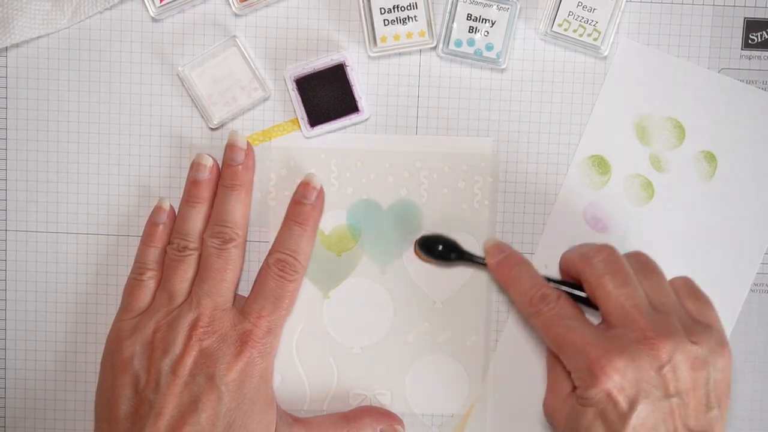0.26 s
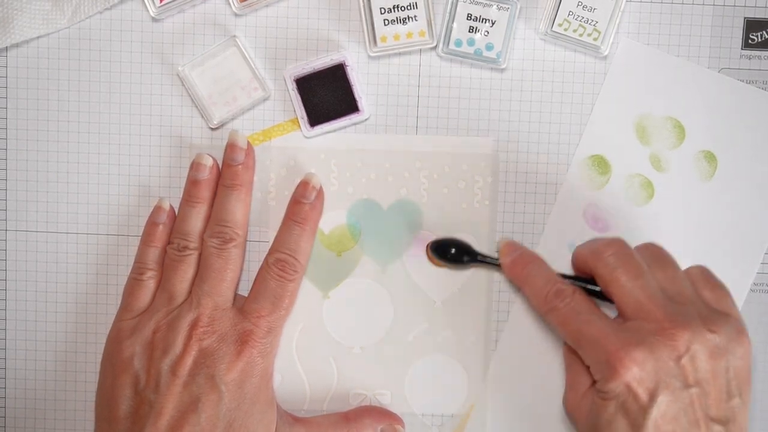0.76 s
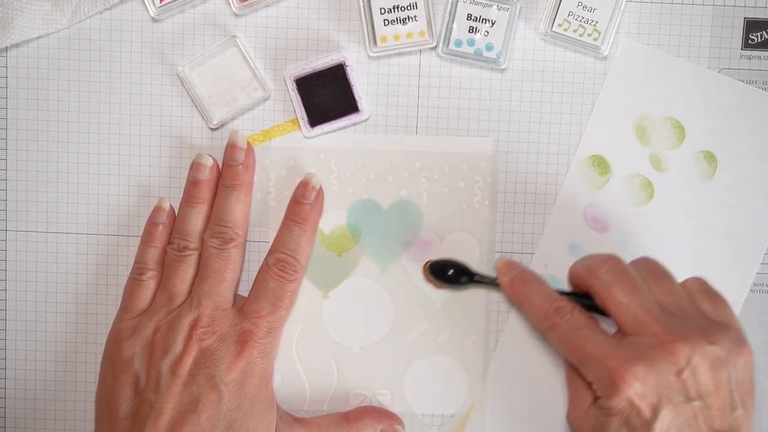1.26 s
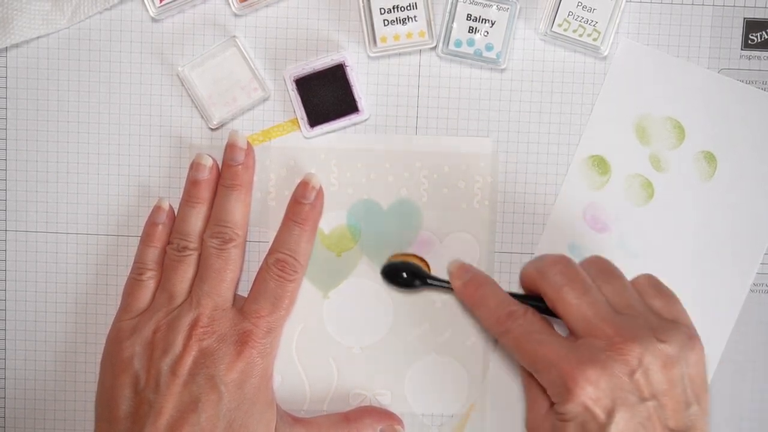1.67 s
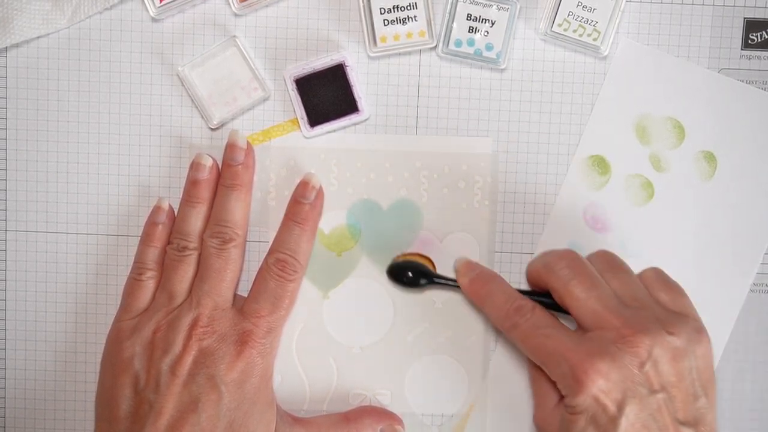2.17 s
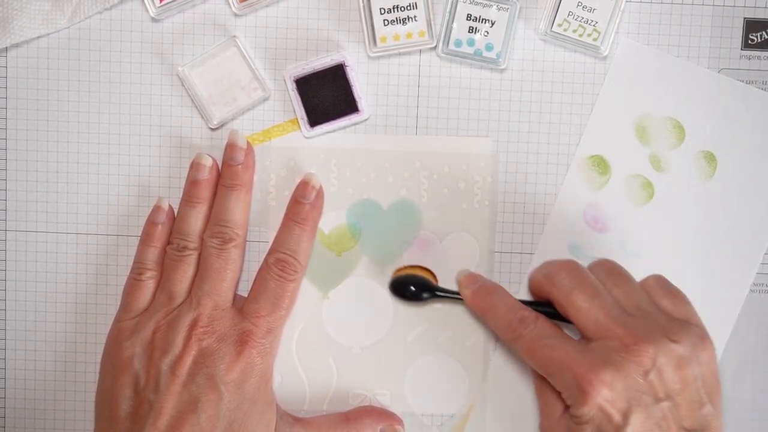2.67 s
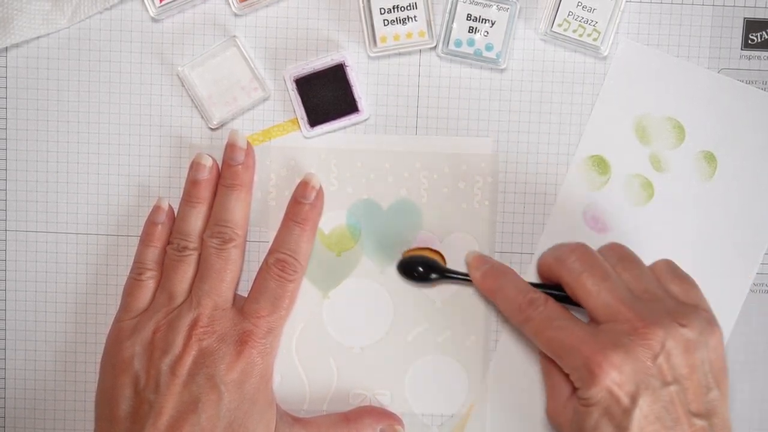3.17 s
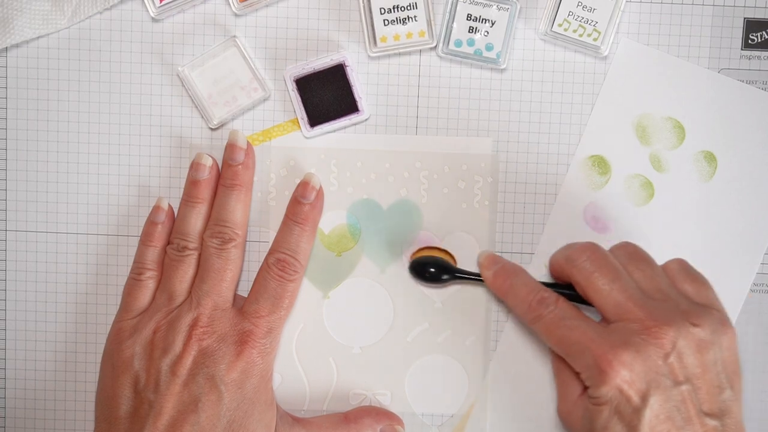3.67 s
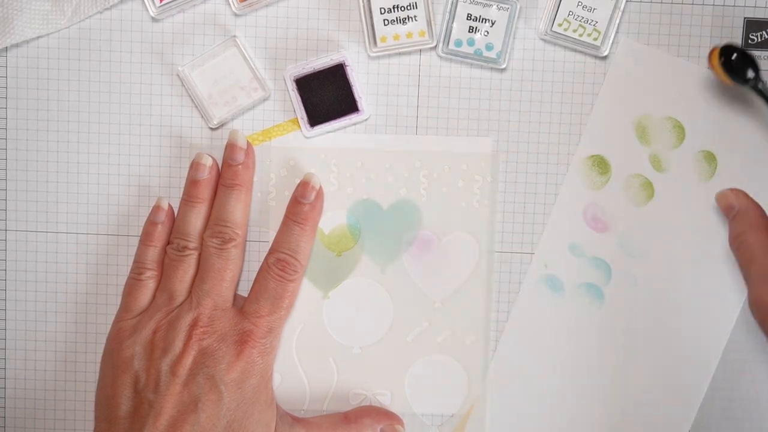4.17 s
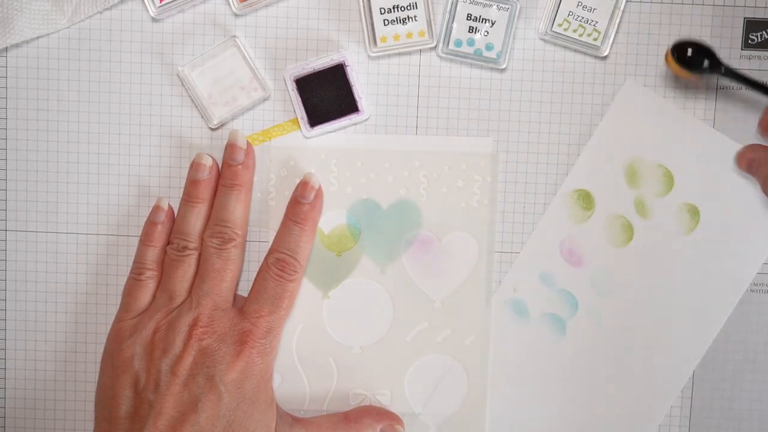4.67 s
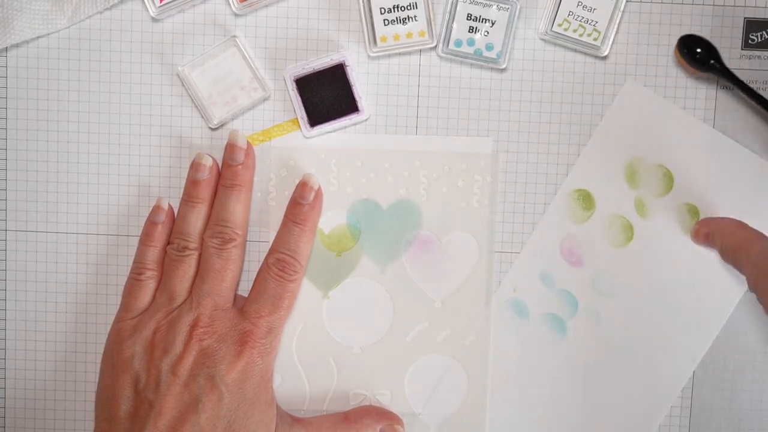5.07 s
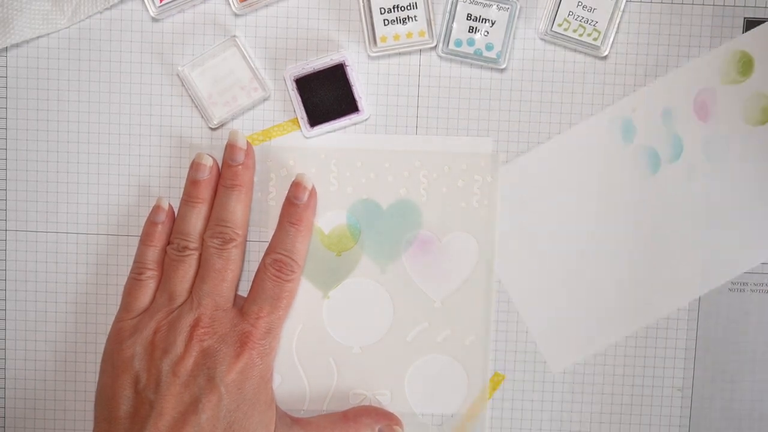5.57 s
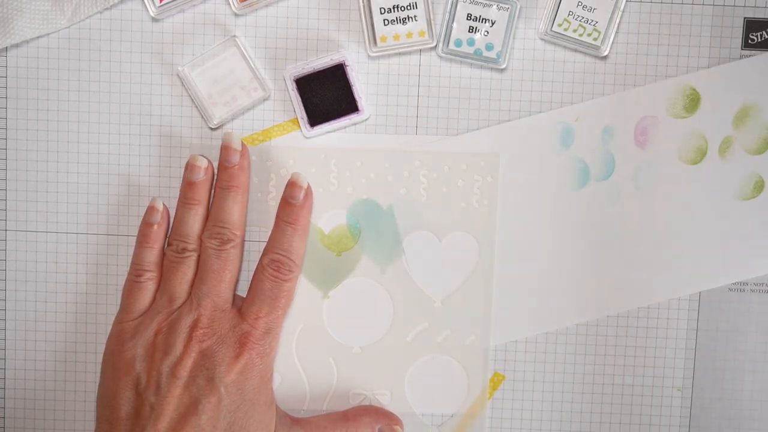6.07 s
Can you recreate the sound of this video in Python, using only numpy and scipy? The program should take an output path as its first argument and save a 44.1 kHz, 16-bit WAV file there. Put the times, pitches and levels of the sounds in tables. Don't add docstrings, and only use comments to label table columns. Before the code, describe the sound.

Close stereo pickup of a craft table: very quiet bristle swishes grow slightly firmer, with tiny clicks on cut edges and soft table creaks. After a brief lull, paper snaps sharply once, pauses, snaps again even louder, then scrapes across the mat in uneven strokes and fades, leaving the low hum and faint air noise of an appliance.

```python
import sys
import numpy as np
from scipy import signal
from scipy.fft import rfft, irfft, next_fast_len
from scipy.io import wavfile
from scipy.ndimage import uniform_filter1d, map_coordinates

SR = 44100
rng = np.random.default_rng(int(sys.argv[2]) if len(sys.argv) > 2 else 0)


def wav_record(signal):
    frames = np.transpose(np.atleast_2d(signal))
    bounded = np.clip(frames, -1, 1)
    quanta = np.round(bounded * 32767).astype(np.int16)
    wavfile.write(sys.argv[1], SR, quanta)


def field_ratio(decibels):
    return 10 ** (np.asarray(decibels, dtype=float) / 20)


N = 278271

# [f/Hz, level/dB rms]
HUM_TONES = [(59.2, -101), (360.7, -71.5), (480.3, -77.5)]
# [f/Hz, density/dB per Hz]
AIR_SPECTRUM = [(20, -47), (90, -41.5), (125, -34), (200, -26), (250, -29), (300, -23), (390, -14.5),
                (440, -21), (520, -22.5), (750, -28), (1000, -25.5), (2400, -26.5), (6000, -32.5),
                (11000, -35), (15700, -37.5)]
# [f/Hz, left-right likeness/0..1]
AIR_ALIKE = [(30, .999), (150, 1), (550, 0.83), (1650, 0.36), (4970, .32), (15000, .13)]
AIR_LEVEL_DB = -70

# [middle t/s, bristle hiss level/dB, length/s]
STROKES = [(0.084, -71.1, 0.077), (0.185, -72.0, 0.07), (0.382, -69.2, 0.195), (0.61, -69.7, 0.261),
           (0.754, -69.8, 0.055), (0.829, -66.3, 0.096), (0.952, -63.7, 0.127), (1.087, -65.0, 0.086),
           (1.209, -63.3, 0.169), (1.351, -65.2, 0.084), (1.438, -61.9, 0.08), (1.539, -63.0, 0.3),
           (1.672, -59.3, 0.106), (1.782, -60.7, 0.08), (1.93, -61.6, 0.175), (2.172, -61.6, 0.211),
           (2.31, -68.0, 0.29), (2.433, -65.8, 0.048), (2.505, -65.1, 0.3), (2.666, -57.8, 0.077),
           (2.776, -61.1, 0.145), (2.91, -59.6, 0.105), (3.011, -62.2, 0.056), (3.164, -59.8, 0.177),
           (3.289, -58.8, 0.135), (3.377, -58.1, 0.061), (3.497, -61.1, 0.153), (3.667, -64.3, 0.083),
           (3.837, -59.7, 0.269), (3.987, -57.6, 0.096)]
# [t/s, loss/dB]
HALTS = [
    (1.555, 6),
    (2.312, 3),
    (2.797, 9),
    (3.81, 4),
]
HALT_S = .012
# [t/s, fizz re hiss/dB, stencil body re hiss/dB]
BRUSH_LEANING = [(0.0, 5, -18), (0.3, 4, -18), (0.45, 0, -16), (0.9, -1, -18), (1.5, 2, -11),
                 (1.68, 1, -19), (1.79, 1, -10), (1.86, 1, -14), (2.3, 1.5, -12), (2.7, 0, -15),
                 (3.1, 1, -16), (3.3, 4, -8), (3.38, 1, -12), (3.52, 4.5, -7), (3.8, 3.5, -7),
                 (4.05, 2, -14)]
# [f/Hz, width/Hz, level/dB]
STENCIL_MODES = [(1810, 47, -4), (2853, 53, -2.5), (3840, 110, -3.5), (4404, 32, -2.5), (4880, 34, -3),
                 (5724, 270, 0), (6660, 230, 0.5), (7370, 52, -3), (7900, 120, -6), (8780, 130, 0.5),
                 (9400, 570, 0.5), (10260, 170, -6.5), (11400, 370, -15), (11700, 130, -0.5),
                 (12600, 120, -0.5), (15000, 170, -6)]
# [f/Hz, density/dB per Hz]
BRISTLE_SPECTRUM = [(350, -52), (600, -24.5), (1560, -21), (1860, -12), (3220, -13), (3850, -5),
                    (5190, -10.5), (5790, -4.5), (7310, -5.5), (12100, 0), (15700, -0.5)]
# [f/Hz, left-right likeness/0..1]
BRUSH_ALIKE = [(60, 1.0), (180, 0.86), (550, 0.82), (1650, 1), (4970, 0.8), (15000, 0.5)]
# [f/Hz, left minus right/dB]
BRUSH_BALANCE = [(60, 0.0), (180, 0.5), (550, 1.5), (1650, -1.5), (4970, -2.9), (15000, -0.5)]

# [full t/s, level/dB, rise/s per 20 dB, hold/s, fall/s per 20 dB]
CREAKS = [
    (.25, -74, .04, .04, .1),
    (1.9, -71, .05, .08, .1),
    (2.33, -75, .02, .02, .06),
    (2.81, -72, .005, .03, .1),
    (3.065, -69, .006, .06, .12),
    (3.9, -71, .02, .05, .1),
    (4.34, -71, .03, .05, .1),
    (4.5, -73, .02, .04, .1),
    (4.69, -74, .02, .03, .1),
    (5.15, -73, .02, .04, .1),
]
# [f/Hz, density/dB per Hz]
FRAME_SPECTRUM = [(150, -40), (250, -6), (300, 0), (480, 2), (560, 0), (700, -20), (1000, -50)]

# [t/s, peak/dB, centre f/Hz, t60/s]
TICKS = [(1.568, -40.5, 4360, 0.017), (1.8294, -51, 5700, 0.02), (3.3564, -38.5, 5700, 0.016),
         (3.8403, -33.5, 7200, 0.012), (3.849, -34, 7000, 0.01), (4.3186, -46, 9000, 0.011),
         (4.453, -50, 8000, .015), (4.9686, -52, 7100, 0.017), (5.0675, -39.5, 6780, 0.02),
         (5.1105, -37, 7800, 0.014), (1.6363, -46, 6000, .015), (2.1342, -48, 9500, .012),
         (2.645, -48, 5500, .012), (2.8072, -45, 5000, .016), (3.0601, -51, 3000, .016),
         (3.145, -46, 5500, .01), (2.517, -55, 1880, 0.03), (2.809, -48, 1880, 0.03),
         (3.061, -52, 1040, 0.037)]

# [full t/s, level/dB, rise/s per 20 dB, hold/s, fall/s per 20 dB]
SCUFFS = [(2.085, -61.5, .045, .05, .14), (2.2, -70, .03, .03, .15), (2.325, -68, .015, .01, .06),
          (2.522, -78, .02, .01, .06), (2.809, -64, .004, .004, .05), (3.064, -64, .01, .008, .06),
          (3.09, -70, .02, .04, .06), (3.872, -62.5, .015, .02, .1), (3.9, -60.5, .03, .04, .16),
          (4.47, -66, .004, .01, .1), (5.112, -67, .003, .005, .03), (5.137, -58, .004, .004, .02),
          (5.165, -64, .004, .04, .15), (5.255, -58, .005, .01, .17)]
# [f/Hz, width/Hz, level/dB]
TABLE_MODES = [(953, 110, -10), (1300, 100, 3.5), (1820, 85, 2)]
# [f/Hz, density/dB per Hz]
THUD_SPECTRUM = [(200, -28.5), (450, 3), (700, -3), (1300, -1.5), (2100, -2), (2700, -15.5), (5000, -40)]

# [full speed t/s, rasp level/dB, rise/s per 20 dB, hold/s, fall/s per 20 dB]
SLIDES = [(4.325, -89, .005, .065, .03), (4.425, -75, .045, .03, .025), (4.473, -60.5, .005, .033, .053),
          (4.557, -66, .021, .028, .013), (4.674, -37.5, .06, .037, .055), (4.765, -67, .061, 0, .28),
          (5.023, -75, .032, .063, .028), (5.128, -39, .009, .021, .04), (5.168, -44, .025, .023, .072),
          (5.231, -44, .02, .011, .02), (5.261, -30, .01, .016, .082), (5.321, -38.5, .016, .126, .066),
          (5.483, -35.5, .07, .038, .032), (5.537, -38.5, .105, .049, .026), (5.598, -44, .009, .043, .145),
          (5.677, -40.5, .04, .072, .093), (5.772, -41.5, .03, .045, .04), (5.859, -37.5, .036, .016, .04),
          (5.946, -42, .099, .014, .07), (5.988, -39.5, .021, .018, .015), (6.026, -67, .003, 0, .33),
          (6.176, -76, .01, .005, .01)]
# [from t/s, fingertip hiss re rasp/dB, sheet body re rasp/dB]
CONTACTS = [(4.2, 18.5, 0), (4.464, 1, 1), (4.54, 5, -9), (4.615, 5, -23), (4.67, 4, -15), (4.705, -6, -7),
            (4.995, 14, 2), (5.112, -3, -21), (5.165, 2.5, -9), (5.246, -7, -9), (5.315, 1, -11),
            (5.365, -5, -15), (5.41, -1.5, -17), (5.54, -3, -16), (5.655, -1, -8), (5.705, -1, -13),
            (5.76, 1, -9), (5.8, 0, -15), (5.845, -6, -9), (5.89, -1.5, -4), (5.975, -1, -9),
            (6.005, -2, -1), (6.03, -2, -6)]
CONTACT_SHIFT_S, SLIDE_DB = .015, -2
# [t/s, peak/dB, treble re peak/dB, body re peak/dB, t60/s]
SNAPS = [(4.469, -31, 2, -41.5, 0.02), (4.4744, -36.5, -12.5, -14, 0.035), (4.6716, -35, -15.5, -12, 0.036),
         (4.6895, -4.5, -18, -21, 0.026), (5.1625, -10.5, -3, -12, 0.017), (5.1685, -26, -14, -8, .015),
         (5.184, -35, -14, -18, .03), (5.2334, -48.5, -3.5, -14, 0.023), (5.245, -32.5, -7.5, -5.5, 0.021),
         (5.2512, 0, -8.5, -17.5, 0.022), (5.2565, -14, -16, -18, .012), (5.4805, -31, -8, -25, 0.025),
         (5.5045, -30, -10, -20, .02), (5.5165, -30, -12, -20, 0.022), (5.571, -39, -8, -20, .02),
         (5.696, -36, -8, -12, .015), (5.7336, -24.5, -10, -12, 0.02), (5.8755, -43.5, -8, -8, 0.038)]
SNAP_RISE_S, RISE_GROWS_DB_PER_DB = .0024, .4
TREBLE_T60_RATIO = .7
# [f/Hz, density/dB per Hz]
RASP_SPECTRUM = [(300, -57.5), (500, -32.5), (950, -28), (1200, -18), (2200, -10), (2650, -8), (3200, -0.5),
                 (6200, 0), (8000, -6), (10000, -10.5), (11200, -14.5), (12800, -11.5), (14300, -15.5),
                 (15700, -19.5)]
# [f/Hz, width/Hz, level/dB]
MAT_MODES = [(1300, 130, -8), (1880, 100, -5.5), (2300, 130, -5)]
# [from t/s, modes (f/Hz, width/Hz, level/dB)]
SHEET_SHAPES = [
    (4.2, [(7400, 400, -1), (9700, 300, -5), (11700, 200, -2.5), (13000, 200, -2.5), (7450, 120, -3)]),
    (4.464, [(4460, 44, -3.5), (5060, 44, 0), (6880, 56, 5), (9270, 44, -12)]),
    (4.54, [(4130, 28, -6.5), (5720, 46, -0.5), (6510, 85, -1.5), (7230, 52, 7), (9420, 31, -7), (8000, 4500, -6)]),
    (4.668, [(1400, 400, 0), (2150, 300, -1), (3194, 140, 1), (4310, 99, -11), (5440, 120, 0.5), (9400, 92, -5.5)]),
    (4.705, [(2440, 42, -1), (3760, 71, 0), (4280, 63, -2), (5350, 120, -2), (6100, 33, -3)]),
    (4.95, [(7300, 170, -1), (9260, 190, -2), (11600, 34, -3.5), (12600, 100, 0), (13710, 37, -6)]),
    (5.108, [(3016, 71, 1), (3280, 250, -2.5), (5800, 200, -9.5), (7930, 37, -11), (9920, 220, -9.5), (12600, 130, -9.5), (7000, 900, -2)]),
    (5.158, [(2990, 120, 0), (3330, 99, 0), (5810, 200, -4), (9590, 220, -11), (12700, 190, -13), (13900, 140, -13)]),
    (5.18, [(2970, 89, 0), (5400, 28, -2), (8630, 150, -3), (9180, 23, -5), (12200, 39, -3), (13300, 59, -7)]),
                (5.246, [(2370, 53, -10.5), (1250, 300, 3), (2850, 60, -1), (3780, 51, 4.5), (4025, 49, -5), (5590, 58, 1.5), (6030, 76, -6), (5920, 120, -9.5), (7840, 32, -11.5)]),
    (5.35, [(2310, 110, -4.5), (2970, 74, -5.5), (3370, 150, 0), (4200, 130, 0), (4504, 36, -10), (5230, 160, -4.5), (6290, 61, -2.5), (6220, 32, -5), (6760, 100, -4), (9270, 74, -1.5)]),
    (5.465, [(2490, 39, -15), (3290, 64, 0), (4130, 66, 0), (5230, 47, -2), (6180, 34, -2), (6340, 39, -2), (6800, 96, -6), (9010, 67, -11)]),
    (5.575, [(3000, 25, -7), (3260, 230, -3), (4140, 110, 0), (4530, 36, -5), (6170, 110, -4), (7160, 47, -7), (9150, 100, -12)]),
    (5.66, [(3240, 57, -2), (3605, 46, -2), (4280, 120, -1), (5400, 38, -3), (5900, 31, -3), (6580, 60, 0.5), (9770, 270, 2)]),
    (5.728, [(3230, 65, 0), (3540, 39, 0), (4300, 110, -2), (5880, 64, -2), (6390, 41, -1), (9860, 81, -4), (12900, 63, -12)]),
    (5.84, [(2200, 160, 1.5), (2914, 110, 0.5), (3150, 50, -3.5), (4084, 190, -5.5), (4900, 29, -10), (5346, 53, -6.5), (6110, 50, -1.5), (9730, 52, -6), (12600, 48, -5)]),
    (5.91, [(2190, 52, -3), (2990, 37, -2), (3210, 72, 0), (4090, 210, -2), (5260, 36, -1), (5890, 44, -3), (9720, 55, -7), (12600, 41, -7)]),
    (6.02, [(2300, 500, -4), (4200, 600, -6), (6000, 600, -6)]),
]
# [f/Hz, left-right likeness/0..1]
PAPER_ALIKE = [(60, 0.93), (180, 0.87), (550, 1), (1650, 0.97), (4970, 0.89), (15000, 0.45)]
# [f/Hz, left minus right/dB]
PAPER_BALANCE = [(60, 0.0), (180, -0.5), (550, 0.5), (1650, -4), (4970, -2), (15000, -1)]

# [f/Hz, t60/s]
ROOM_T60 = [(500, 0.49), (3000, 0.21), (12000, 0.062)]
BODY_TOP_HZ, FIZZ_FROM_HZ = 2807, 7560
TOP_HZ = 15750


def unit(x):
    return x / np.sqrt(np.mean(x ** 2) + 1e-20)


def along(points, hz):
    f, v = np.transpose(points)
    return np.interp(np.log(hz + 1), np.log(f + 1), v)


def wobble(rate_hz):
    knots = rng.standard_normal(int(N * rate_hz / SR) + 4)
    return map_coordinates(knots, [np.arange(N) * rate_hz / SR])


def filtered(x, response):
    n = x.shape[-1]
    m = next_fast_len(n + SR // 10)
    spectrum = rfft(x, m) * response(np.fft.rfftfreq(m, 1 / SR))
    return irfft(spectrum, m)[..., :n]


def resonant(spectrum, modes, base_db):
    def response(f):
        bumps = sum(field_ratio(db) ** 2 / (1 + (2 * (f - c) / (w + 60)) ** 2) for c, w, db in modes)
        return field_ratio(along(spectrum, f)) * np.sqrt(field_ratio(base_db) ** 2 + bumps)
    return response


def grit(spread_db, clump_db, rate_hz):
    uneven_db = spread_db * np.minimum(rng.exponential(1, N), 4)
    clumps_db = np.clip(clump_db * wobble(rate_hz), -6, 4)
    return field_ratio(uneven_db + clumps_db) * rng.standard_normal((2, N))


def patchy(x, depth_db):
    z = signal.stft(x, nperseg=512)[2]
    field = uniform_filter1d(rng.standard_normal(z.shape[1:]), size=5, axis=0)
    field = uniform_filter1d(field, size=14, axis=1)
    return signal.istft(z * field_ratio(depth_db * unit(field)), nperseg=512)[1][:, :N]


def ranges(x):
    low = lambda f: 1 / (1 + (f / BODY_TOP_HZ) ** 8)
    high = lambda f: 1 - 1 / (1 + (f / FIZZ_FROM_HZ) ** 8)
    middle = lambda f: 1 - low(f) - high(f)
    sounding = x[0] != 0
    parts = [filtered(x, response) for response in (middle, high, low)]
    return [part / np.std(part[:, sounding]) for part in parts]


def rub(gain, high_db, low_db, parts):
    middle, high, low = parts
    return gain * (middle + field_ratio(high_db) * high + field_ratio(low_db + 1) * low)


def place(pair, alike, balance):
    turn = lambda hz: np.arccos(np.clip(along(alike, hz), 0, 1)) / 2
    mid, side = filtered(pair, lambda hz: np.array([np.cos(turn(hz)), np.sin(turn(hz))]))
    stereo = np.array([mid + side, mid - side])
    return filtered(stereo, lambda hz: field_ratio(along(balance, hz) * [[.5], [-.5]]))


def swells(rows):
    t = np.arange(N) / SR
    power = 0
    for s, db, rise, hold, fall in rows:
        away = np.maximum(0, np.maximum((s - t) / rise, (t - s - hold) / fall))
        power = power + field_ratio(db - 20 * away) ** 2
    return np.sqrt(power)


def column(rows):
    s, *cols = np.transpose(rows)
    return [np.interp(np.arange(N) / SR, s, c) for c in cols]


def hum():
    t = np.arange(N) / SR
    tones = np.zeros(N)
    for hz, db in HUM_TONES:
        strength = field_ratio(db + 4 + 1.2 * wobble(7.6))
        tones += strength * np.sin(2 * np.pi * hz * t + 0.18 * wobble(24))
    return tones * field_ratio([[.7], [-.7]])


def floor():
    air = filtered(rng.standard_normal((2, N)), lambda hz: field_ratio(along(AIR_SPECTRUM, hz)))
    upper = filtered(air, lambda hz: hz > 600)
    stereo = place(air, AIR_ALIKE, [(100, 0.18), (9000, -0.53)])
    return field_ratio(AIR_LEVEL_DB) * stereo / np.std(upper)


def pressure():
    t = np.arange(N) / SR
    power = sum(field_ratio(db - 24 * ((t - s) / length) ** 2) ** 2 for s, db, length in STROKES)
    loss_db = sum(db * np.exp(-((t - s) / HALT_S) ** 2) for s, db in HALTS)
    return np.sqrt(power) * field_ratio(-loss_db)


def brush():
    slips = patchy(grit(spread_db=1.5, clump_db=.9, rate_hz=150), depth_db=1.1)
    texture = filtered(slips, resonant(BRISTLE_SPECTRUM, STENCIL_MODES, base_db=-10.5))
    gain = pressure() * field_ratio(0.78 * wobble(24.88) + 0.18)
    fizz_db, body_db = column(BRUSH_LEANING)
    return place(rub(gain, fizz_db, body_db, ranges(texture)), BRUSH_ALIKE, BRUSH_BALANCE)


def creaks():
    push = unit(filtered(rng.standard_normal(N), lambda hz: field_ratio(along(FRAME_SPECTRUM, hz))))
    return swells(CREAKS) * push * np.ones((2, 1))


def ticks():
    out, t = np.zeros(N), np.arange(SR // 16) / SR
    for s, db, hz, t60 in TICKS:
        edges_hz = [hz / 1.2, min(hz * 1.8, 16000)]
        band = signal.butter(2, edges_hz, "band", fs=SR, output="sos")
        puff = signal.sosfilt(band, rng.standard_normal(len(t)))
        fade = field_ratio(-60 * t / t60) * (1 - np.exp(-t / .0006))
        out[round(s * SR):][:len(t)] += field_ratio(db - 5) * np.std(fade) * unit(fade * puff)
    return out * field_ratio([[-.6], [.6]])


def wrist():
    slips = grit(spread_db=2, clump_db=1.8, rate_hz=110)
    texture = unit(filtered(slips, resonant(THUD_SPECTRUM, TABLE_MODES, base_db=-4.5)))
    return place(swells(SCUFFS) * texture, BRUSH_ALIKE, BRUSH_BALANCE)


def reshaped(x, base_db):
    out, fade = np.zeros_like(x), SR // 100
    shapes = SHEET_SHAPES
    starts = [round(s * SR) for s, _ in shapes] + [N]
    for begin, end, (_, modes) in zip(starts, starts[1:], shapes):
        colour = resonant(RASP_SPECTRUM, modes + MAT_MODES, base_db)
        part = unit(filtered(x[:, begin:end + fade], colour))
        k = np.arange(part.shape[1])
        ramp = np.clip(np.minimum(k, end + fade - begin - k) / fade, 0, 1)
        out[:, begin:end + fade] += part * np.sqrt(ramp)
    return out


def touch():
    s, *cols = np.transpose(CONTACTS)
    now = np.maximum(np.searchsorted(s, np.arange(N) / SR) - 1, 0)
    return [uniform_filter1d(c[now], size=round(CONTACT_SHIFT_S * SR)) for c in cols]


def add_snaps(sheet, parts):
    t = np.arange(SR // 8) / SR
    for s, db, high_db, low_db, t60 in SNAPS:
        start = round(s * SR)
        at = slice(start, start + len(t))
        rise_s = SNAP_RISE_S * field_ratio(RISE_GROWS_DB_PER_DB * (db + 10))
        swell = field_ratio(-60 * t / t60) * (1 - np.exp(-t / rise_s)) * [[1.2], [.45]]
        quick = field_ratio(-60 * t / t60 * (1 / TREBLE_T60_RATIO - 1))
        middle, high, low = (unit(swell * fade * part[:, at]) for part, fade in zip(parts, (1, quick, 1)))
        burst = middle + field_ratio(high_db + 1.5) * high + field_ratio(low_db + 2) * low
        sheet[:, at] += field_ratio(db - 3) * np.std(swell) * burst


def paper():
    slips = patchy(grit(spread_db=1.5, clump_db=1.2, rate_hz=260), depth_db=1.5)
    parts = ranges(reshaped(slips, base_db=-9.5))
    sheet = rub(swells(SLIDES) * field_ratio(.6 * wobble(40) + SLIDE_DB), *touch(), parts)
    add_snaps(sheet, parts)
    thin = filtered(sheet, lambda hz: 1 - 1 / (1 + (hz / 500) ** 4))
    return place(thin, PAPER_ALIKE, PAPER_BALANCE)


def room(x):
    hz, t, z = signal.stft(rng.standard_normal((2, SR // 2)), SR, nperseg=256)
    decay = field_ratio(-60 * t / along(ROOM_T60, hz)[:, None])
    tail = signal.istft(z * decay, SR, nperseg=256)[1]
    delayed = np.pad(x, ((0, 0), (130, 0)))
    return signal.fftconvolve(delayed, tail / np.linalg.norm(tail[0]), axes=1)[:, :N]


def scene():
    table = brush() + creaks() + ticks() + wrist() + paper()
    return table + field_ratio(-16) * room(table) + hum() + floor()


def band_limit(x):
    return signal.sosfilt(signal.butter(12, 16970, fs=SR, output="sos"), x)


def record(dry):
    mix = filtered(dry, lambda hz: np.where(hz < TOP_HZ, 1, field_ratio(-36)))
    return band_limit(mix)


dry = scene()
out = record(dry)
wav_record(out)
```